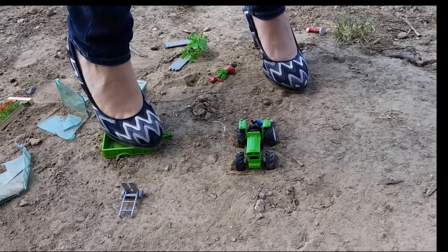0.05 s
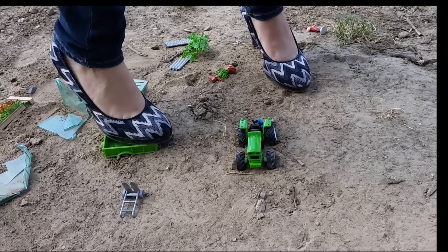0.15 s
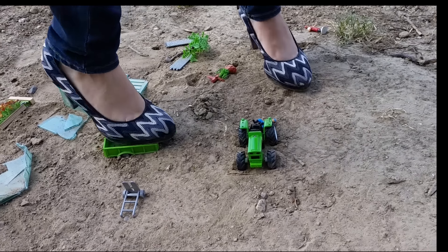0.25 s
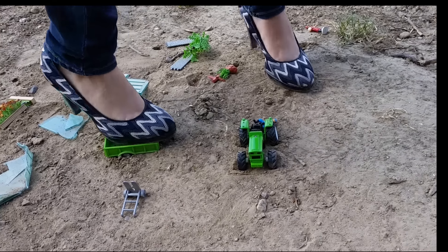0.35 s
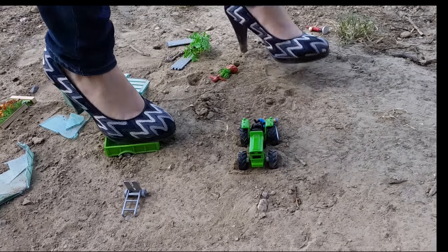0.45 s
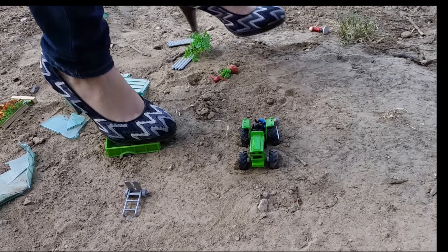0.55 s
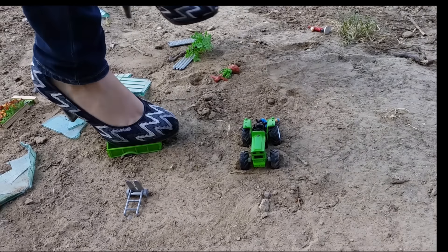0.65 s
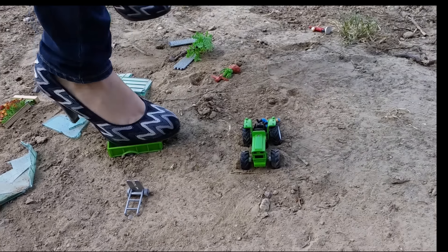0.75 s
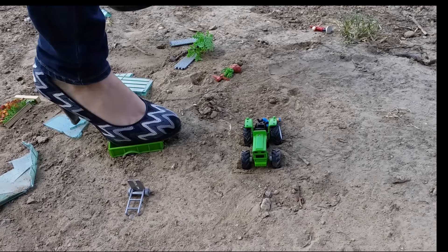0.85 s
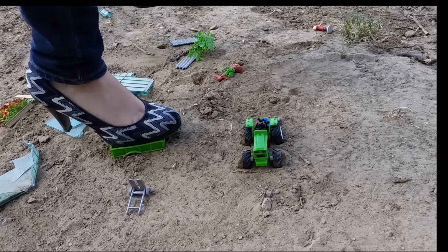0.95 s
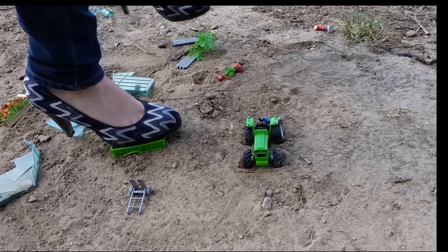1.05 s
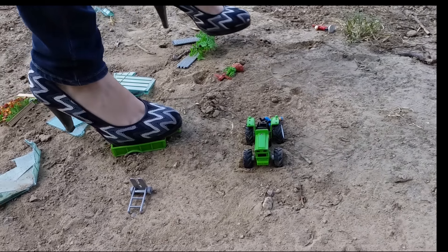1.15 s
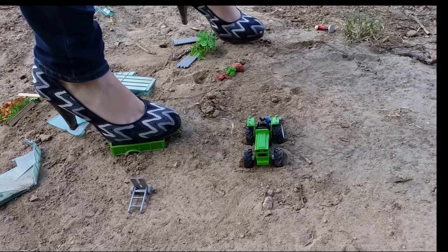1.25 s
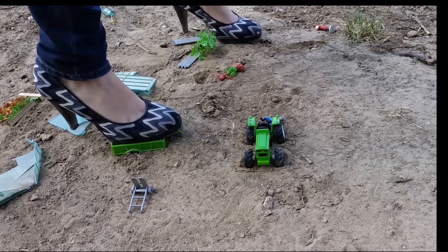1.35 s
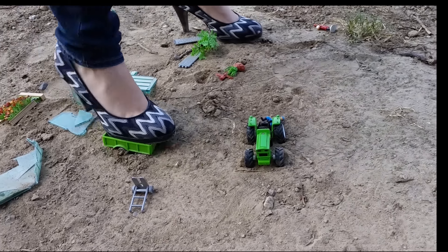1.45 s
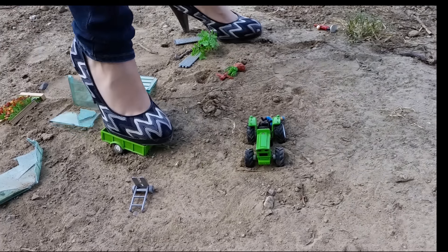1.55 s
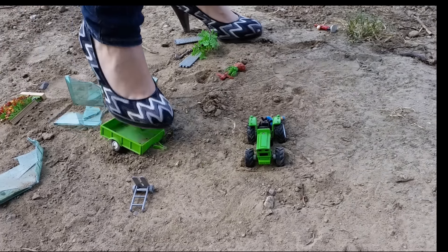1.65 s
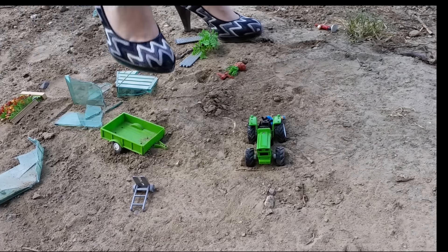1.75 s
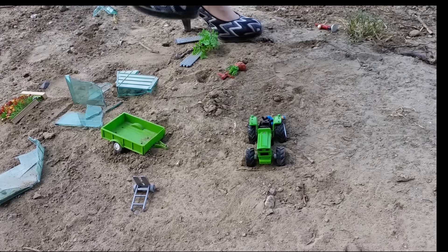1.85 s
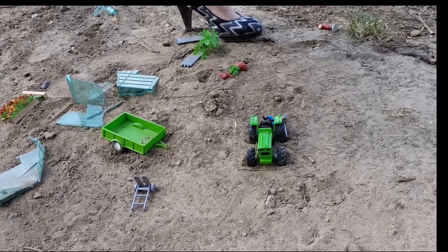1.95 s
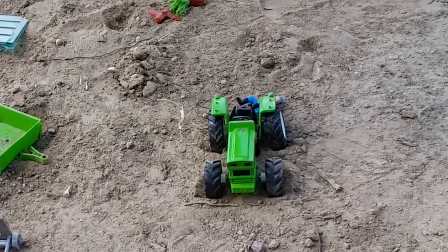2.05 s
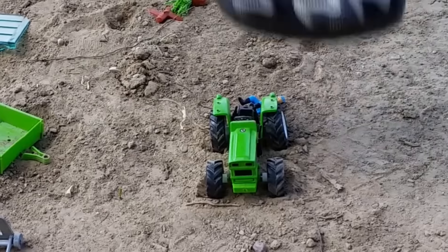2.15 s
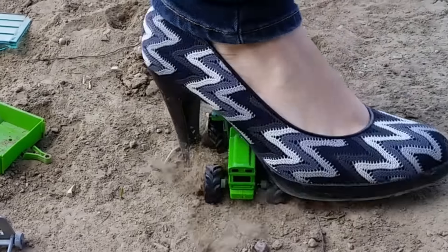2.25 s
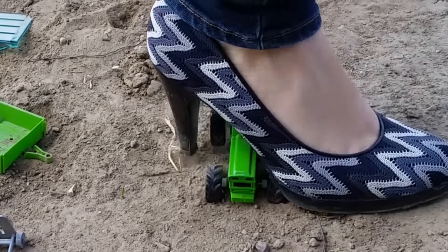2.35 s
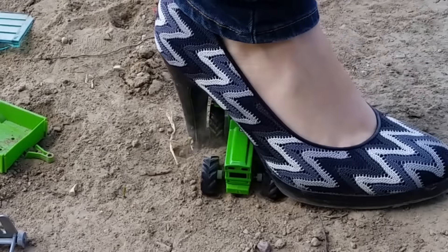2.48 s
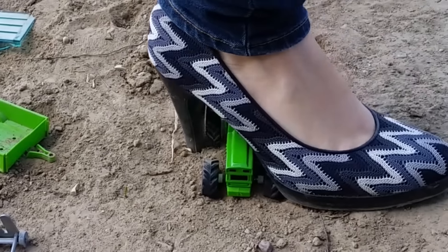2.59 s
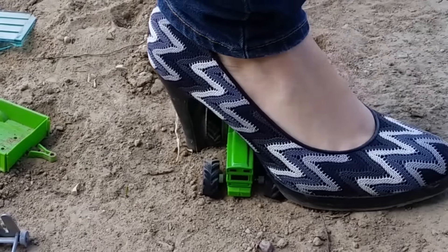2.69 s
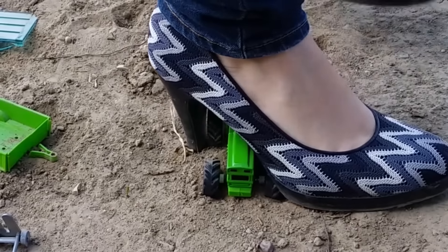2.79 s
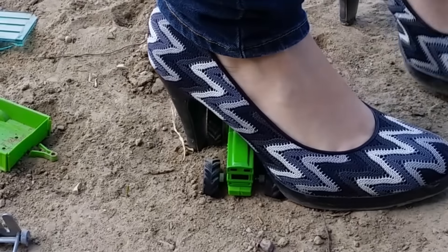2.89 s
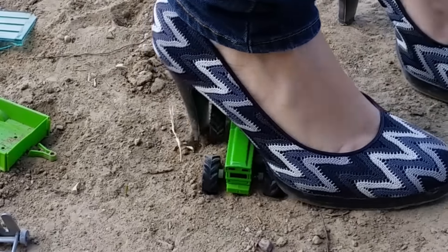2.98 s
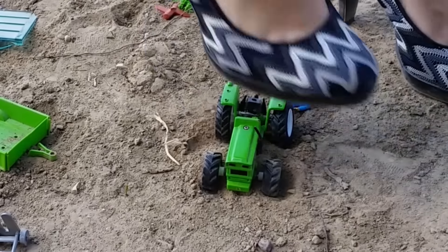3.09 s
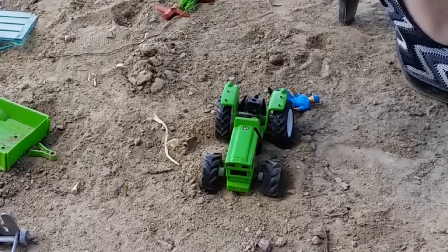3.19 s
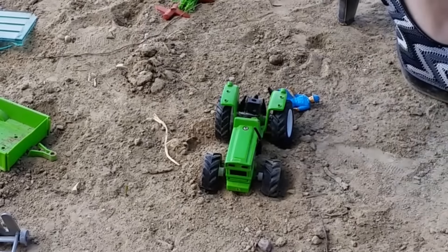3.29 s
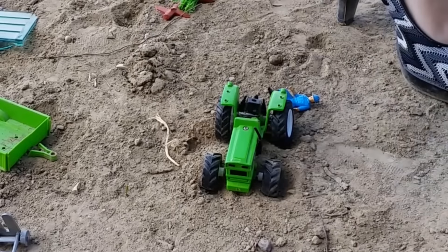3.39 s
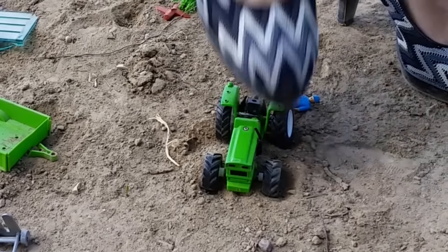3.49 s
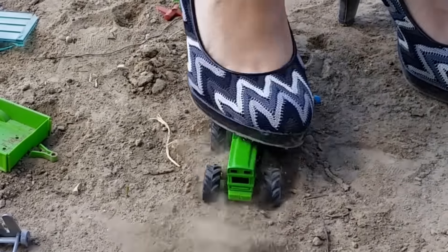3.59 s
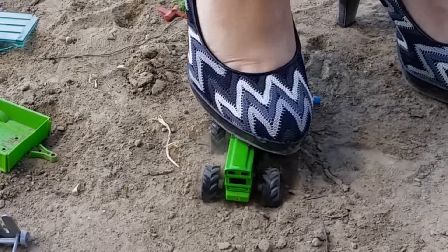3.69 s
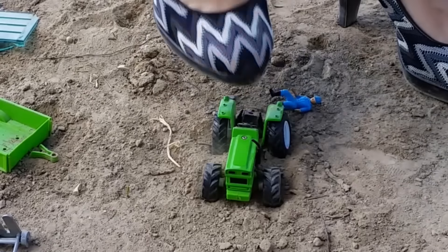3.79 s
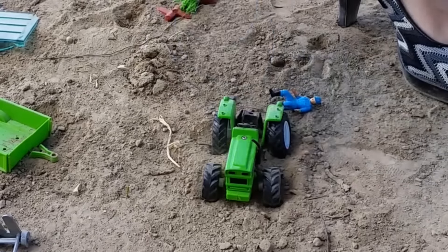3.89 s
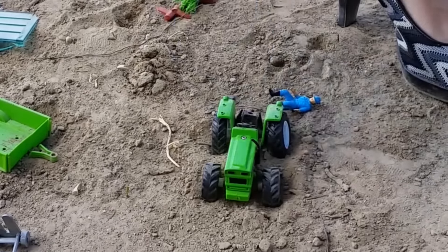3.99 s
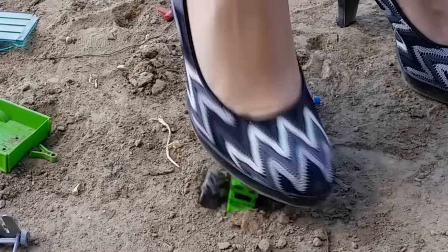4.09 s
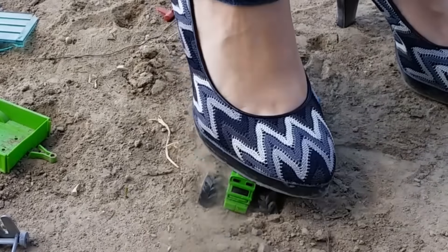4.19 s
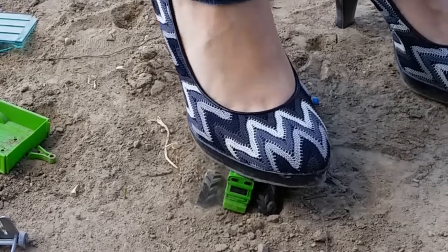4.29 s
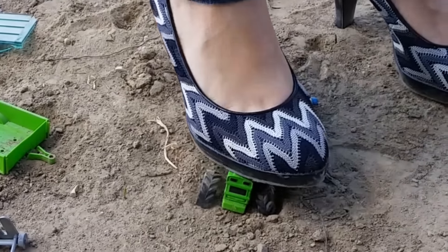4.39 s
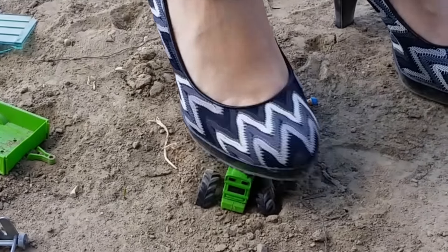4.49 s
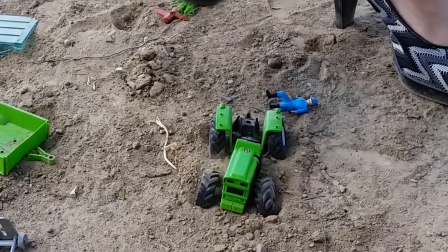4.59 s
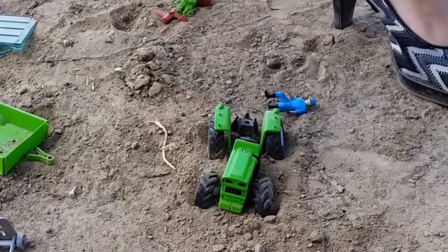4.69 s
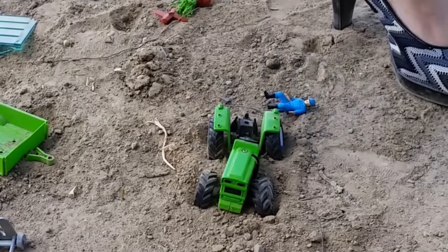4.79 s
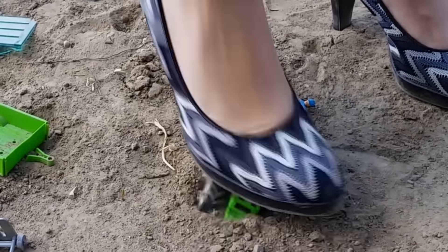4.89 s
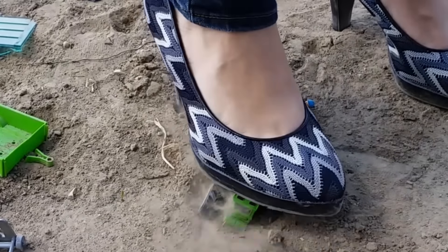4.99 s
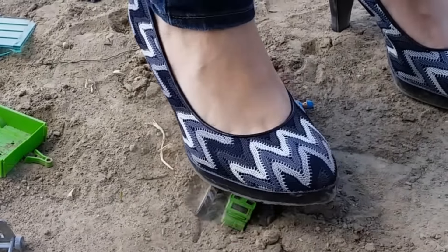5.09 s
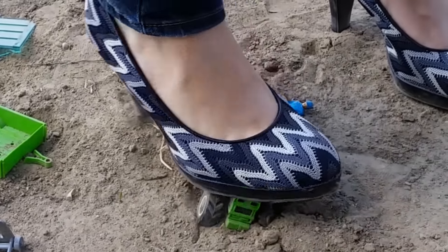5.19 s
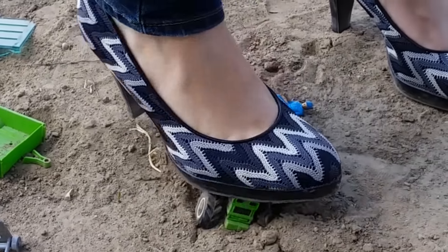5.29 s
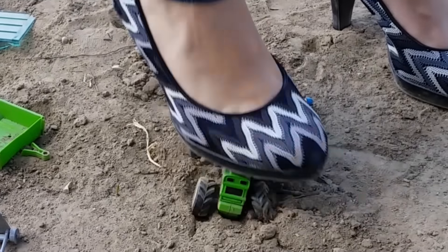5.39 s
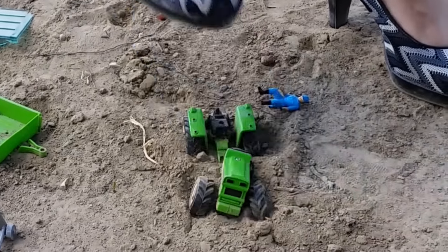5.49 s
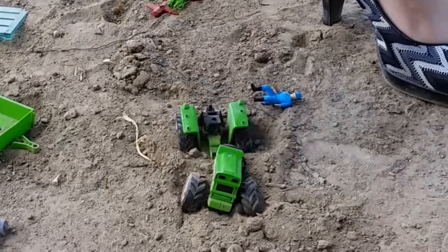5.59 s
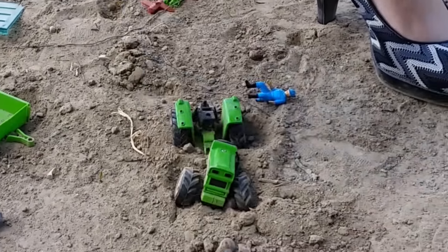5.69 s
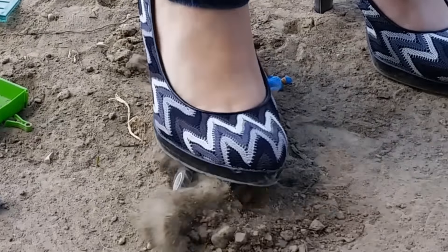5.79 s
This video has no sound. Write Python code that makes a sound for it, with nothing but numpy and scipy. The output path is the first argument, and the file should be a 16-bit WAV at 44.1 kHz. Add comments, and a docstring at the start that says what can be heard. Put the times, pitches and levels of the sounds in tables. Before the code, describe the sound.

Outdoors on dry dirt, a high-heeled shoe leans on a hollow plastic toy trailer, which ticks faintly, scrapes and springs free with a knock. The shoe then stamps five times on a toy tractor, giving dull thuds, sharp plastic cracks and small sprays of sand. Gusts rumble on the close stereo microphone, mostly on the left, over a soft hiss.

```python
"""Sand grinds and plastic ticks under a high-heeled shoe, on dry dirt, close to a small stereo microphone.
The shoe leans on a hollow toy trailer, which scrapes and springs free, then stamps five times on a toy
tractor: a thud into the ground, a volley of cracks from the shell, a spray of sand. Gusts buffet the
microphone ports, mostly the left one. A soft, wide background hiss fades with the wind and returns."""
import sys
import numpy as np
from scipy import signal
from scipy.fft import rfft, irfft
from scipy.io import wavfile

SR = 44100
rng = np.random.default_rng(int(sys.argv[2]) if len(sys.argv) > 2 else 0)


def unload_wav(signal):
    """Save mono or channel-first audio to the path in sys.argv[1] as 16-bit WAV at rate SR, clipped to [-1, 1]."""
    wavfile.write(
        sys.argv[1],
        SR,
        np.round(np.clip(np.atleast_2d(signal).T, -1, 1) * 32767).astype(np.int16),
    )


N = 257720
TIME = np.arange(N) / SR
SHORT = TIME[:8192]  # time axis of one hit

# plastic fracturing close to the microphone, and the sharp noisy edges of the axle clicks at 0.22 s and
# 0.68-0.69 s: t/s, sharp snap/dB, hollow body/dB
CRACKS = [(0.217, -51, -76), (0.66, -62, -57), (0.678, -46, -51), (0.689, -65, -66), (1.029, -49, -42),
          (1.044, -64, -45.5), (1.105, -48.5, -50), (1.304, -51, -64), (1.5046, -74, -57),
          (1.736, -42, -37.5), (1.743, -41, -42), (1.817, -48.5, -47), (1.889, -58, -54),
          (2.3165, -42, -49.5), (2.3243, -36.5, -24.5), (2.329, -44.5, -29), (2.3345, -37.5, -29),
          (2.3385, -29.5, -32.5), (2.345, -43.5, -30), (2.542, -57, -44), (2.565, -61, -48.5),
          (2.598, -55, -54), (2.666, -57.5, -51), (3.0255, -52, -38.5), (3.1375, -53, -43),
          (3.6293, -34, -25), (3.6418, -29.5, -26.5), (3.6445, -29.5, -31.5), (3.6475, -30, -33),
          (3.676, -45, -38.5), (3.783, -57.5, -51.5), (3.814, -51.5, -55.5), (4.216, -35.5, -28.5),
          (4.2215, -30, -35.5), (4.228, -46, -40.5), (4.235, -25.5, -28.5), (4.565, -67.5, -69),
          (4.621, -55, -66), (4.626, -52, -57.5), (4.646, -48, -62), (5.017, -56, -42.5),
          (5.0243, -44, -44), (5.0475, -52, -61)]
# spectrum of the snap: f/Hz, level/dB
SNAP_COLOUR = [(1500, -31.5), (4000, 1), (5600, -2.5), (7400, 2.5), (9200, 0.5), (12000, 3.5), (15500, -2)]
# spectrum of the hollow shell: f/Hz, level/dB
BODY_COLOUR = [(200, -12), (700, 4.5), (1300, -8), (1580, -4), (1830, -0.5), (2600, -1.5), (3200, -3.5),
               (4500, -6.5), (5400, -28), (9000, -39)]
# stamps on the tractor: t/s, delay until it bottoms out/s, flat clap/dB, push into the ground/dB,
# ring/dB, ring dull above/Hz, ring length factor, sand spray/dB
STAMPS = [(2.3224, 0.0097, -58, -19, -18, 2400, 0.61, -54),
          (3.0238, 0.0035, -46, -21.5, -39, 550, 0.98, -75),
          (3.6287, 0.012, -16.5, -20, -21.5, 2400, 0.97, -52),
          (4.2151, .003, -29, -15.5, -22, 3000, 0.51, -50),
          (5.0163, 0.00411, -23.5, -22, -29, 855, 0.58, -75)]
# sole and tractor ringing together: f/Hz, level/dB, t60/s
SOLE_MODES = [(214.2, -4, 0.15), (265, -0.5, 0.1), (342, -3, 0.086), (428, 5.5, 0.066), (494, 0.5, 0.073),
              (651, -3, 0.078), (850, -11, .05), (960, -13.5, 0.074), (1099, -7, 0.081), (1302, -0.5, .07),
              (1413, -7.5, 0.094), (1817, 0, 0.08), (2276, -8, 0.039), (2800, -17, .06),
              (3004, -5.5, 0.076)]
# the hollow trailer ringing freely: f/Hz, level/dB, t60/s
TRAILER_MODES = [(282, -2.5, 0.18), (587, -11, 0.085), (730, -6.5, 0.14), (923, 1, 0.061),
                 (1200, 1.5, 0.12), (1286, 5.5, 0.094), (1340, 10, 0.1), (1360, 4.5, 0.06),
                 (1830, -7, 0.11), (2350, -1, 0.072), (2520, -10, 0.18), (2940, -5, 0.032),
                 (3140, -12, 0.02)]
# knocks on the trailer: t/s, level/dB, ring length factor (short under the sole, longer once free)
KNOCKS = [(0.217, -56, 1.4), (0.689, -45.5, 0.33), (1.029, -35, 0.74), (1.044, -37, 0.26), (1.737, -37, .6),
          (1.746, -40.5, 0.97)]
# the trailer dragged under the sole: t at full force/s, hold/s, rise/s, level/dB
DRAGS = [(1.012, 0.0045, 0.081, -48), (1.102, 0.018, 0.15, -59.5), (1.541, 0.062, 0.054, -39),
         (1.739, 0.01, 0.063, -45)]
# the trailer's stiff axle clips: f/Hz, level/dB, t60/s
AXLE_MODES = [(6255, -1.5, 0.017), (7200, -6, 0.023), (10550, 2, 0.017), (12100, -2, .03),
              (13550, -2, 0.021), (14250, 1, .02)]
# the axle jumps in its clips: t/s, level/dB
AXLE_CLICKS = [(0.204, -60), (0.217, -48), (0.678, -62), (0.685, -57), (0.689, -44)]
# the tractor's bent chassis: f/Hz, level/dB, t60/s
CHASSIS_MODES = [(4100, 5, 0.012), (7540, 1.5, 0.013), (9360, 3.5, 0.015), (10100, -2, 0.016)]
# the chassis slips back into shape: t/s, level/dB
CHASSIS_SLIPS = [(4.6203, -58), (4.6238, -50.5), (4.627, -51), (4.645, -59)]
# small parts twang as they give way: t/s, f/Hz, level/dB, t60/s
TWANGS = [(0.687, 1340, -43, 0.028), (1.31, 3170, -56.5, .06), (1.321, 2470, -57, 0.068),
          (1.753, 1403, -40.5, .2), (2.3333, 7900, -40.5, 0.011), (3.1372, 1816, -40, 0.022),
          (3.1376, 2360, -43, 0.013), (3.1356, 3100, -44.5, .022), (3.644, 11840, -35, 0.025),
          (4.2149, 1388, -34.5, 0.029), (4.2162, 2270, -35.5, 0.016), (4.233, 7370, -37, 0.023)]
# the foot shoves the ground: t at full force/s, hold/s, rise/s, grinding sand/dB, crumbling earth/dB
SHOVES = [(0.199, 0.028, .13, -62.5, -63.5), (0.31, 0.19, 0.072, -69.5, -81), (0.733, 0.028, 0.2, -64, -89),
          (1.042, .01, 0.021, -51, -63), (1.096, 0.0078, 0.11, -54.5, -62), (1.316, 0.013, 0.08, -56, -77),
          (1.422, .01, .07, -70, -51.5), (1.571, 0.044, 0.075, -48, -43), (1.736, 0.016, .03, -48.5, -42.5),
          (1.776, 0.037, 0.31, -61, -54), (2.46, 0.11, .2, -64, -83), (2.56, 0.019, .08, -78, -53),
          (2.657, .03, 0.4, -68.5, -69), (3.095, 0.05, 0.11, -65, -75), (3.835, 0.034, .06, -60, -73),
          (4.251, 0.038, .02, -65.5, -46), (5.261, .01, 0.11, -79.5, -67)]
# ticks of sand grains, coarse to fine: f/Hz
GRAIN_HZ = [900, 1800, 3200, 5000, 7200, 9500, 12000, 14500]
# spectrum of sand under the sole: f/Hz, level/dB
GRIND_COLOUR = [(500, -23.5), (1500, 1.5), (3000, 3), (5000, -7), (7000, -1.5), (8700, -6), (11000, -2.5),
                (14000, -1.5), (16000, -2.5)]
# spectrum of falling sand: f/Hz, level/dB
SPRAY_COLOUR = [(300, -10.5), (1200, -9), (3000, 10.5), (6000, 7), (10500, -1.5), (13000, 0), (16000, -7.5)]
# spectrum of crumbling earth: f/Hz, level/dB
EARTH_COLOUR = [(100, -12), (270, -0.5), (500, 7.5), (900, 0), (1500, -11.5), (2600, -17), (4500, -31.5),
                (9000, -45)]
# breeze at the microphone: t/s, relative level/dB
BREEZE = [(0.0, -53), (0.31, -50.5), (0.75, -42.5), (0.96, -45), (1.36, -46.5), (1.67, -40), (2.98, -41.5),
          (3.22, -34), (3.48, -39.5), (4.13, -37.5), (4.83, -58), (5.84, -52)]
# spectrum of its rumble: f/Hz, level/dB
WIND_COLOUR = [(8, -16), (25, -7.5), (50, 2.5), (90, 2), (140, -4), (200, -9), (300, -23), (500, -50),
               (1000, -57), (3000, -86)]
# the strongest eddies to hit the ports: t/s, half length/s, left/dB, right/dB
GUSTS = [(0.588, 0.012, -18, -51), (1.139, 0.019, -36, -47), (1.458, 0.017, -29, -48),
         (1.608, 0.0055, -22.5, -24), (1.687, 0.0072, -25, -38), (2.163, 0.027, -27.5, -31.5),
         (2.348, 0.013, -20.5, -29), (2.616, 0.023, -26, -28.5), (2.86, 0.033, -25, -56),
         (2.976, 0.0097, -24, -52), (3.027, 0.0015, -18, -20), (3.142, 0.011, -15.5, -22),
         (3.213, 0.044, -28.5, -36.5), (3.275, 0.0082, -26.5, -23), (3.329, 0.0098, -20, -53),
         (3.745, 0.0048, -15.5, -42), (3.784, 0.0088, -23.5, -50), (3.897, 0.011, -19.5, -61),
         (3.928, 0.0061, -10, -54), (3.959, 0.016, -22.5, -49), (4.257, 0.0086, -21, -47),
         (4.287, 0.0071, -17, -50.5), (4.623, 0.032, -37, -53)]
# spectrum of an eddy: f/Hz, level/dB
GUST_COLOUR = [(15, -15.5), (45, -3), (85, 5), (140, 2), (210, -8.5), (300, -16), (450, -38.5), (900, -63),
               (3000, -86.5)]
# soft background hiss: t/s, relative level/dB
HISS = [(0.0, -68.5), (0.57, -59), (1.74, -58), (1.97, -57.5), (2.59, -56), (4.13, -58), (4.31, -66.5),
        (4.77, -78), (4.98, -81), (5.84, -63.5)]
# spectrum of the hiss: f/Hz, level/dB
HISS_COLOUR = [(150, -10.5), (300, 1.5), (550, -0.5), (1000, -0.5), (1400, -6.5), (2000, -15), (3100, -20),
               (4100, -15.5), (4900, -31.5), (8500, -41), (12500, -31.5), (16000, -31.5)]
# how far the hiss leans to the left port: f/Hz, left over right/dB
HISS_LEAN = [(60, 9), (150, 11.5), (380, 0.5), (950, 7.5), (2380, 2.5), (5980, 1.5), (15000, 2.0)]
# likeness of the two ports for a close source: f/Hz, likeness/0-1
PORT_LIKENESS = [(800, .985), (1400, .8), (3000, .38), (8000, .33), (14000, .3)]
# lead of the left port over the right: f/Hz, phase/rad
PORT_LEAD = [(60, 0), (250, .3), (700, .4), (1400, .9), (3200, 1.1), (6500, -.4), (12000, 1.9)]


def cracks(decay_s=0.0037, edge_s=0.00051, tail_db=-28, tail_s=0.038, rise_s=0.00013):
    """Close up, each fracture is a sharp edge and a few milliseconds of dense ringing in the shell."""
    snap, body = np.zeros((2, 2, N))
    shape = np.exp(-SHORT / decay_s) + np.exp(-SHORT / edge_s) + amp(tail_db) * np.exp(-SHORT / tail_s)
    shape *= 1 - np.exp(-SHORT / rise_s)
    shape /= np.sqrt(np.mean(shape[SHORT < .004] ** 2))
    for s, snap_db, body_db in CRACKS:
        add(snap, s, amp(snap_db) * shape * rng.standard_normal((2, len(SHORT))))
        add(body, s, amp(body_db) * shape * rng.standard_normal((2, len(SHORT))))
    return ports(colour(snap, SNAP_COLOUR), left_db=-1) + ports(colour(body, BODY_COLOUR), left_db=2)


def stamps(ground_hz=158, ground_s=0.0053, rise_s=0.00091, clap_hz=650, clap_s=0.00078, second_db=-6):
    """The sole claps onto the toy; a moment later the toy bottoms out, shoves the ground, rings again."""
    out = np.zeros((2, N))
    give = 1 - np.exp(-SHORT / rise_s)  # the sole gives a little
    push = np.sin(2 * np.pi * ground_hz * SHORT) * np.exp(-SHORT / ground_s) * give
    clap = np.sin(2 * np.pi * clap_hz * SHORT) * SHORT / clap_s * np.exp(1 - SHORT / clap_s)
    for s, delay, clap_db, push_db, ring_db, dull_hz, length, _ in STAMPS:
        first = amp(ring_db) * give * ring_pair(SOLE_MODES, dull_hz, length)
        second = amp(ring_db + second_db) * ring_pair(SOLE_MODES, dull_hz, length)
        first[0] += amp(clap_db) * clap  # row 0 reaches both ports
        second[0] += amp(push_db) * push / push.max()
        add(out, s, first)
        add(out, s + delay, second)
    return ports(out, left_db=1.3)


def trailer(rub_db=-10, pressed_length=0.73):
    """Tiny slips and a few knocks ring the hollow trailer; the sole damps it while pressing."""
    force = sum(amp(db) * stroke(s, hold, rise, release=0.92) for s, hold, rise, db in DRAGS)
    slips = force * grains(per_s=900, spread_db=-1)
    out = resonate(slips, ring(TRAILER_MODES, length=pressed_length))
    out += amp(rub_db) * colour(slips, BODY_COLOUR)
    for s, db, length in KNOCKS:
        add(out, s, amp(db) * ring_pair(TRAILER_MODES, length=length))
    return ports(out, left_db=3.5)


def twangs(lead_rad=1.4):
    """Axle clips and chassis click brightly, splinters twang on one note; the left port leads in phase."""
    out = np.zeros((2, N))
    hits = [(s, db, AXLE_MODES) for s, db in AXLE_CLICKS]
    hits += [(s, db, CHASSIS_MODES) for s, db in CHASSIS_SLIPS]
    hits += [(s, db, [(hz, 0, t60)]) for s, hz, db, t60 in TWANGS]
    placement = pan(left_db=1) * np.array([[1], [np.exp(-1j * lead_rad)]])
    for s, db, modes in hits:
        note = signal.hilbert(ring(modes))[:len(SHORT) // 2]
        add(out, s, amp(db) * (placement * note).real)
    return out


def sand(lift_s=0.01, flight_s=0.068, settle_s=0.036):
    """Right of centre, coarse grains grind under the sole; fine ones thrown by a stamp patter down."""
    flying = np.zeros(N)
    for s, *_, spray_db in STAMPS:
        age = np.maximum(TIME - s, 0)
        settling = np.exp(-np.maximum(age - flight_s, 0) / settle_s)
        flying += amp(spray_db) * (1 - np.exp(-age / lift_s)) * settling
    force = sum(amp(db) * stroke(s, hold, rise, release=0.81) for s, hold, rise, db, _ in SHOVES)
    grind = colour(force * grit(per_s=9000), GRIND_COLOUR) * pan(left_db=-2)
    spray = colour(flying * grit(per_s=17000), SPRAY_COLOUR) * pan(left_db=-5)
    return grind + spray


def earth():
    """Clods of dry earth crumble dully under the sole, close to the microphone."""
    force = sum(amp(db) * stroke(s, hold, rise, release=0.6) for s, hold, rise, _, db in SHOVES)
    crumbs = force * grains(per_s=810, spread_db=3.5)
    return ports(colour(crumbs, EARTH_COLOUR), left_db=1.5)


def wind(left_db=5, right_db=-1, right_follows=0.7, swell_db=2, typical_db=-45):
    """Turbulence swells at each port separately, most at the exposed left one; single eddies bump it."""
    strength = level_curve(BREEZE) / amp(typical_db)
    force = np.array([amp(left_db) * strength, amp(right_db) * strength ** right_follows])
    force *= amp(typical_db + swell_db * swells(slow_hz=1.48, fast_hz=7))
    out = force * colour(rng.standard_normal((2, N)), WIND_COLOUR)
    eddies = colour(rng.standard_normal((2, N)), GUST_COLOUR)
    for s, half, *port_db in GUSTS:
        near = abs(TIME - s) < 3 * half
        bump = eddies[:, near] * np.exp(-((TIME[near] - s) / half) ** 2 / 2)
        power = np.sum(bump ** 2, axis=1, keepdims=True) / (2 * half * SR)
        out[:, near] += amp(port_db)[:, None] * bump / np.sqrt(power)
    return out


def hiss(gain_db=5, likeness=0.14):
    """Soft, wide background hiss that fades with the wind and returns."""
    common, separate = rfft(rng.standard_normal((2, N)))
    lean = amp(at_hz(HISS_LEAN, np.fft.rfftfreq(N, 1 / SR)))
    right = likeness * common + np.sqrt(1 - likeness ** 2) * separate
    pair = irfft([common * lean, right] / np.sqrt((1 + lean ** 2) / 2), N)
    return amp(gain_db) * level_curve(HISS) * colour(pair, HISS_COLOUR)


def yard(x, wet_db=-29, dull_hz=3000, t60=0.28, gap_s=0.006):
    """Adds faint, short scatter from things nearby; the soft ground swallows its treble."""
    tail = rng.standard_normal((2, len(SHORT))) * amp(-60 * SHORT / t60) * (SHORT > gap_s)
    tail = signal.lfilter(*signal.butter(2, dull_hz, fs=SR), tail)
    return x + amp(wet_db) * signal.fftconvolve(x, tail / np.linalg.norm(tail[0]), axes=1)[:, :N]


def ports(x, left_db):
    """Two closely spaced microphone ports: alike in the bass, largely unrelated in the treble."""
    common, separate = rfft(x)
    hz = np.fft.rfftfreq(N, 1 / SR)
    likeness = at_hz(PORT_LIKENESS, hz)
    right = likeness * common + np.sqrt(1 - likeness ** 2) * separate
    right *= np.exp(-1j * at_hz(PORT_LEAD, hz))
    return pan(left_db) * irfft([common, right], N)


def ring(modes, dull_hz=SR, length=1):
    """Dying modes of a struck object, each with a random sign; about unit rms over the first 10 ms."""
    hz, db, t60 = np.transpose(modes)[:, :, None]
    waves = amp(db - 60 * SHORT / (t60 * length)) * np.sin(2 * np.pi * hz * SHORT)
    waves /= np.sqrt(1 + (hz / dull_hz) ** 6)
    power = np.sum(np.mean(waves[:, SHORT < .01] ** 2, axis=1))
    return rng.choice([-1, 1], len(modes)) @ waves / np.sqrt(power)


def ring_pair(modes, dull_hz=SR, length=1):
    """One blow in two channels, each with its own mode signs."""
    return np.array([ring(modes, dull_hz, length) for side in range(2)])


def stroke(s, hold, rise, release):
    """Force of one foot movement: grows tenfold per rise time, holds, falls tenfold per rise * release."""
    early, late = np.maximum(s - TIME, 0), np.maximum(TIME - s - hold, 0)
    return 10 ** (-(early + late / release) / rise)


def grains(per_s, spread_db):
    """Sparse stereo clicks of uneven size, rms 1."""
    size = amp(spread_db * np.minimum(rng.exponential(1, N), 4))
    return unit(size * (rng.random(N) < per_s / SR) * rng.standard_normal((2, N)))


def grit(per_s, finest_cycles=1.9):
    """Sand grains of many sizes, each size ticking at its own pitch; rms 1."""
    out = np.zeros((2, N))
    for hz in GRAIN_HZ:
        life = finest_cycles / np.sqrt(hz * GRAIN_HZ[-1])  # small grains die sooner
        tick = (np.sin(2 * np.pi * hz * SHORT) * np.exp(-SHORT / life) / life)[SHORT < .003]
        hits = grains(per_s / len(GRAIN_HZ), spread_db=2)
        out += signal.oaconvolve(hits, tick[None], axes=1)[:, :N]
    return unit(out)


def swells(slow_hz, fast_hz, count=24):
    """Slow random wavering, separate for each port, rms 1."""
    t, hz = TIME[::256], np.geomspace(slow_hz, fast_hz, count)[:, None]
    waves = np.sin(2 * np.pi * (hz * t + rng.random((2, count, 1)))).sum(1)
    return np.array([np.interp(TIME, t, unit(wave)) for wave in waves])


def colour(x, spectrum, size=8192):
    """Minimum-phase filter of unit energy with the given spectrum."""
    log_gain = np.log(amp(at_hz(spectrum, abs(np.fft.fftfreq(size, 1 / SR)))))
    response = np.exp(np.conj(signal.hilbert(log_gain)))
    return resonate(x, np.fft.ifft(response).real[:size // 2])


def resonate(x, taps):
    """Passes both channels through an impulse response scaled to unit energy."""
    return signal.fftconvolve(x, taps[None] / np.linalg.norm(taps), axes=1)[:, :N]


def at_hz(points, hz):
    """Reads a curve on a log-frequency axis."""
    f, value = np.transpose(points)
    return np.interp(np.log(hz + 1), np.log(f + 1), value)


def level_curve(points):
    """Gain over time from rows of t/s, level/dB."""
    return amp(np.interp(TIME, *np.transpose(points)))


def add(mix, s, sound):
    """Adds a stereo sound at time s."""
    part = mix[:, round(s * SR):][:, :sound.shape[1]]
    part += sound[:, :part.shape[1]]


def pan(left_db):
    """Channel gains that put the left left_db above the right."""
    return amp([[left_db / 2], [-left_db / 2]])


def amp(db):
    """Decibels to gain."""
    return 10 ** (np.asarray(db) / 20)


def unit(x):
    """Scales to rms 1."""
    return x / np.sqrt(np.mean(x ** 2) + 1e-20)


def scene():
    """Outdoors: shoe, toys and dirt up close, wind on the microphone, a soft hiss underneath."""
    toys = cracks() + twangs() + stamps() + trailer()
    return yard(toys) + earth() + sand() + wind() + hiss()


def record(dry):
    """The recorder cuts off the highest treble."""
    lowpass = signal.firwin(255, cutoff=16100, window=("kaiser", 9), fs=SR)
    return signal.oaconvolve(dry, lowpass[None], "same")


dry = scene()
out = record(dry)
unload_wav(out)
```